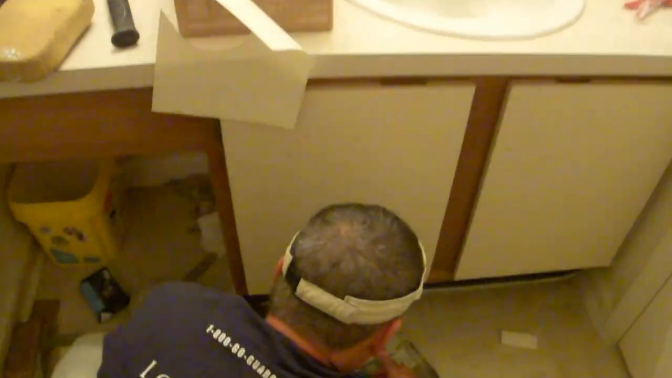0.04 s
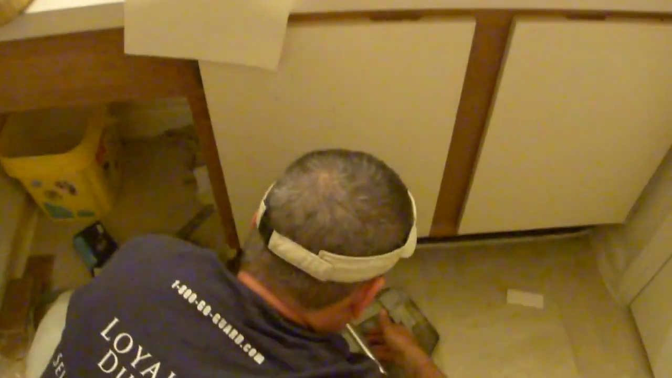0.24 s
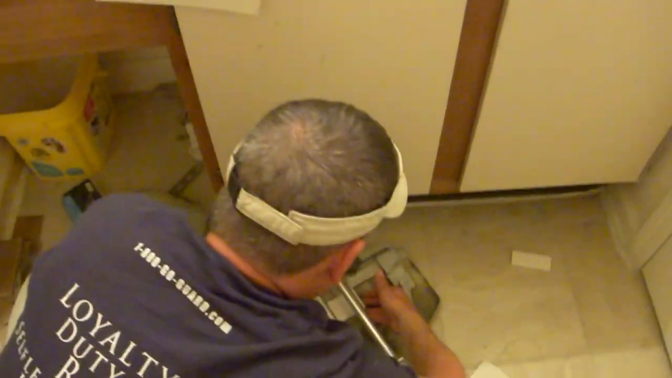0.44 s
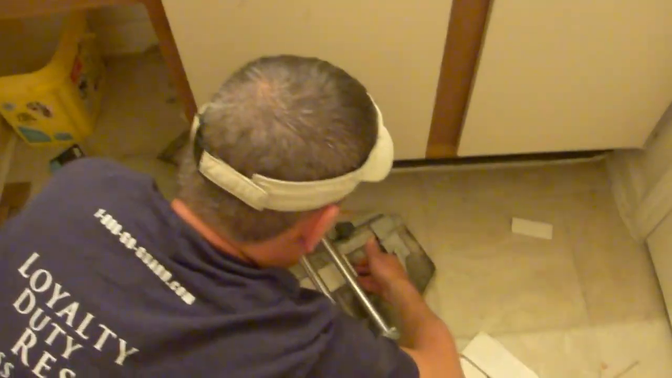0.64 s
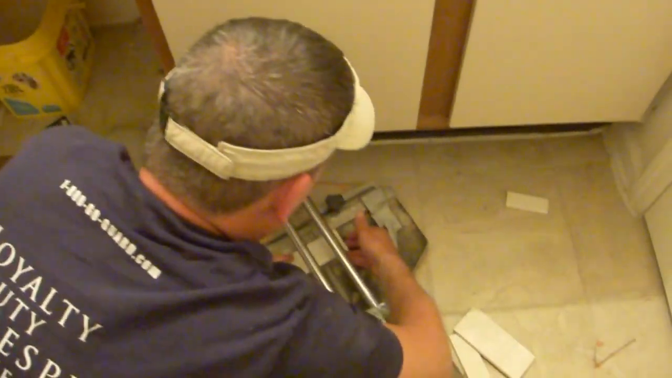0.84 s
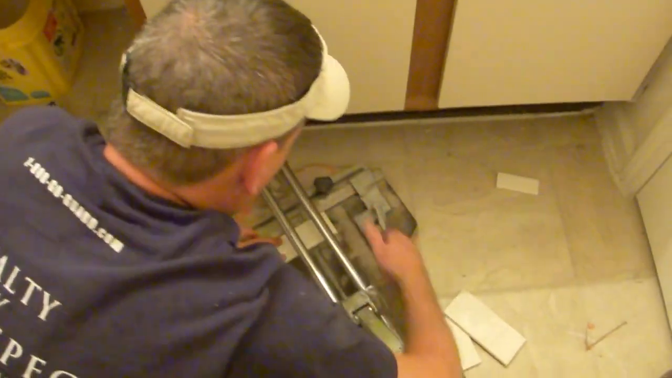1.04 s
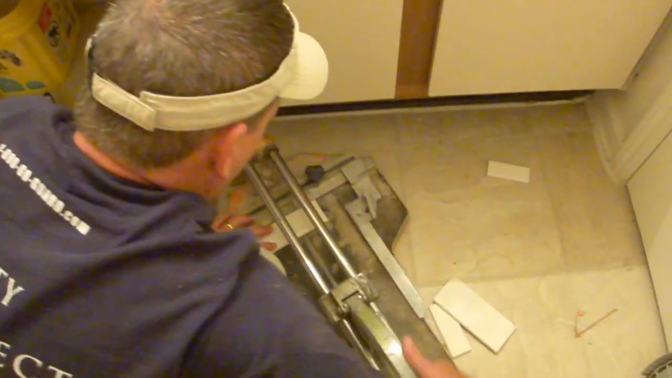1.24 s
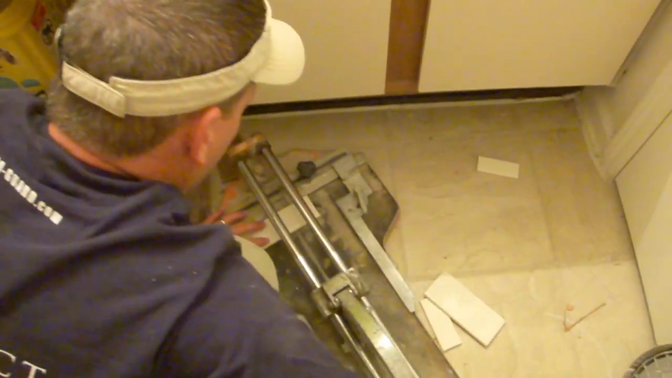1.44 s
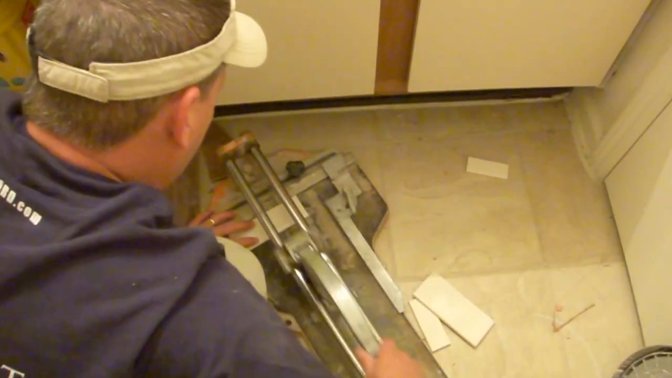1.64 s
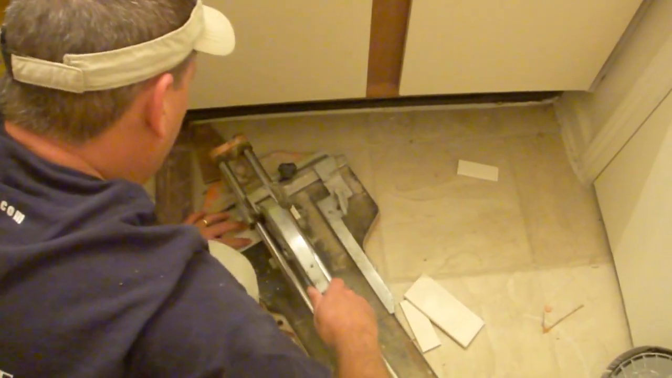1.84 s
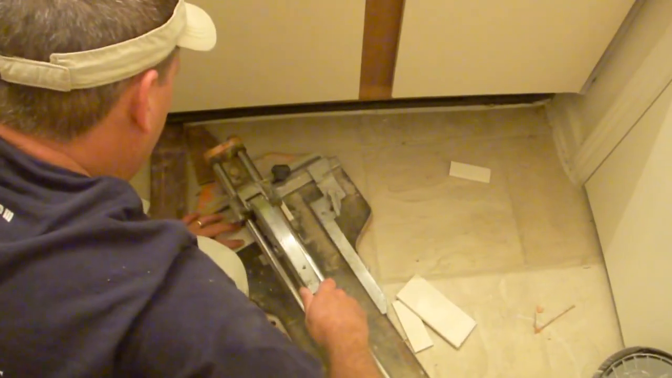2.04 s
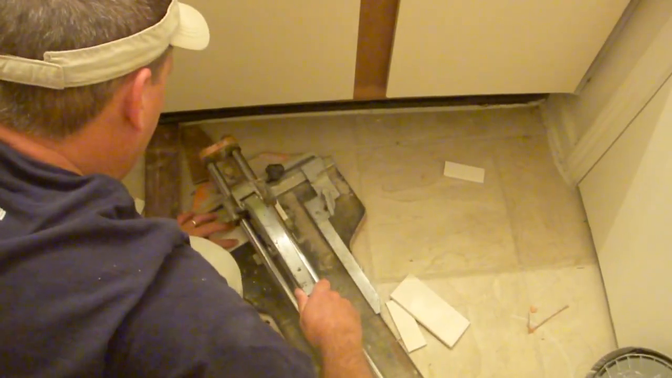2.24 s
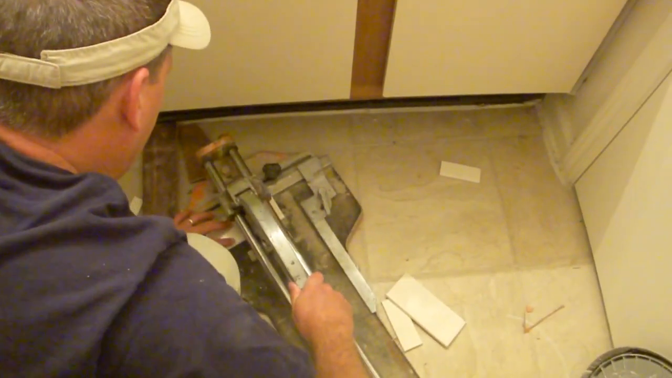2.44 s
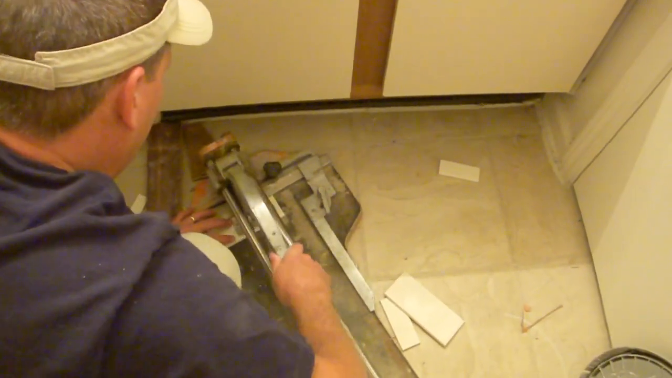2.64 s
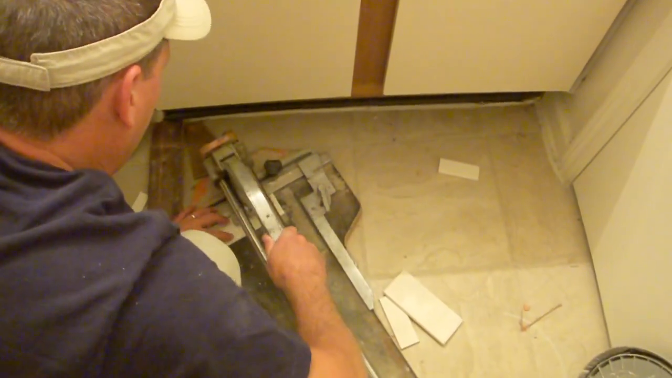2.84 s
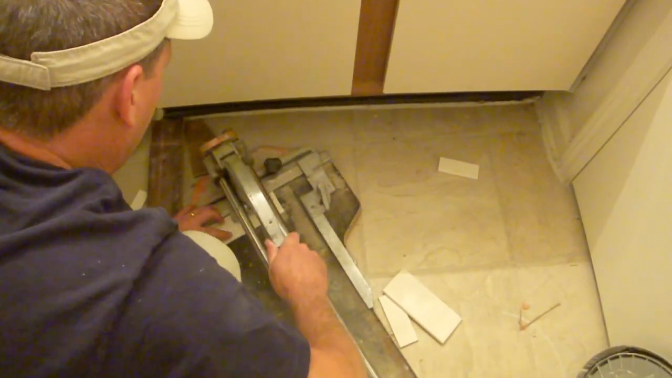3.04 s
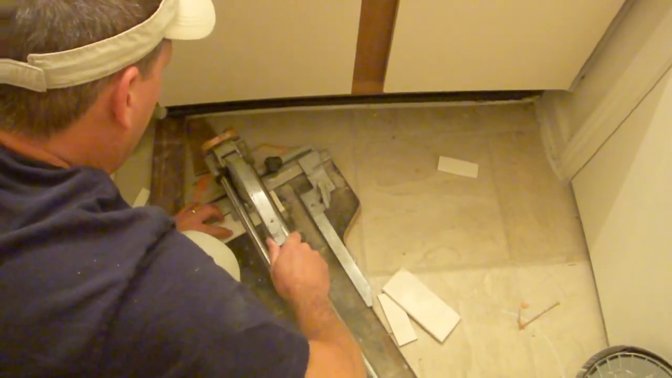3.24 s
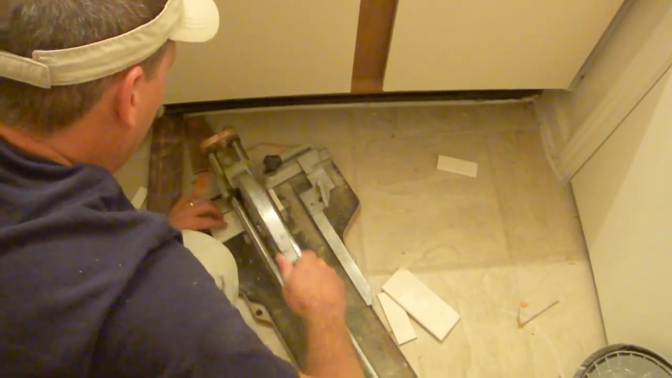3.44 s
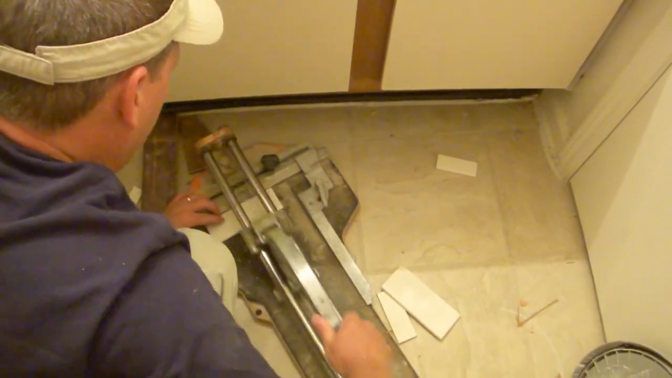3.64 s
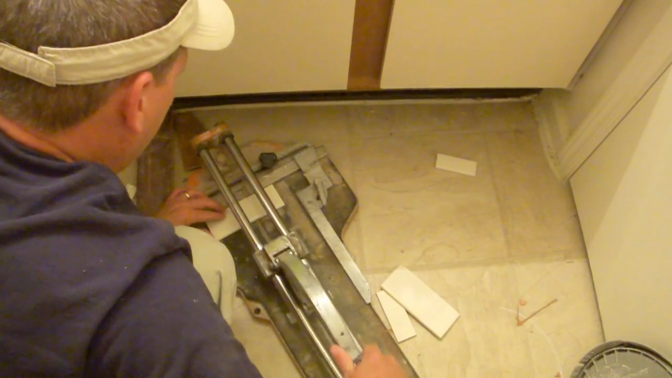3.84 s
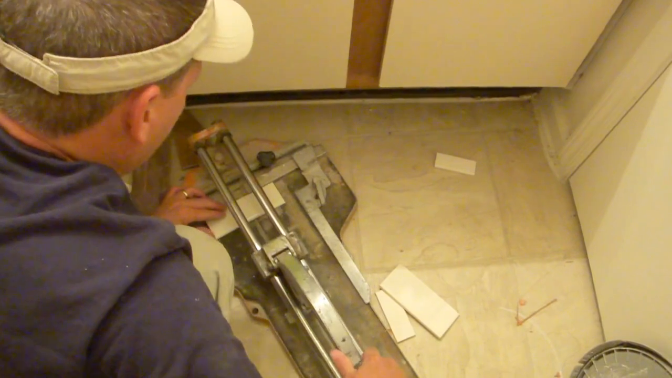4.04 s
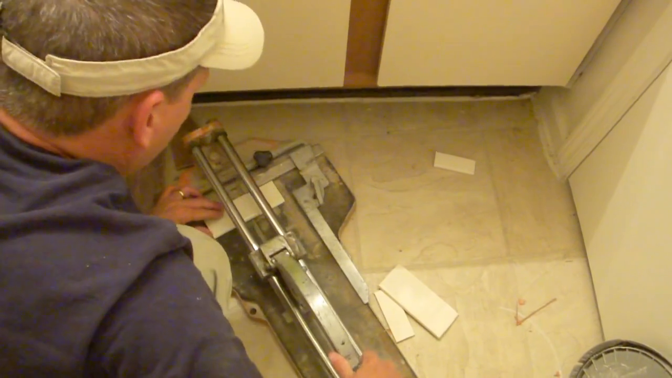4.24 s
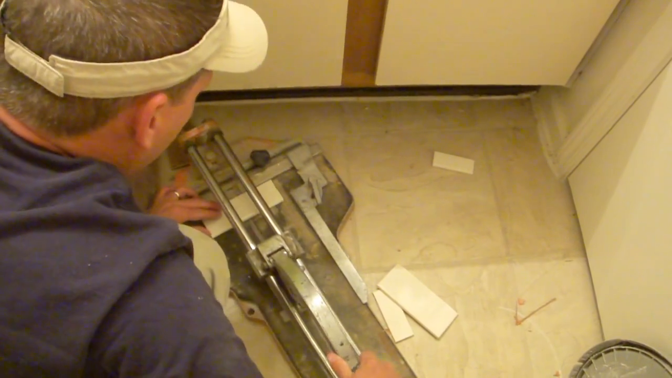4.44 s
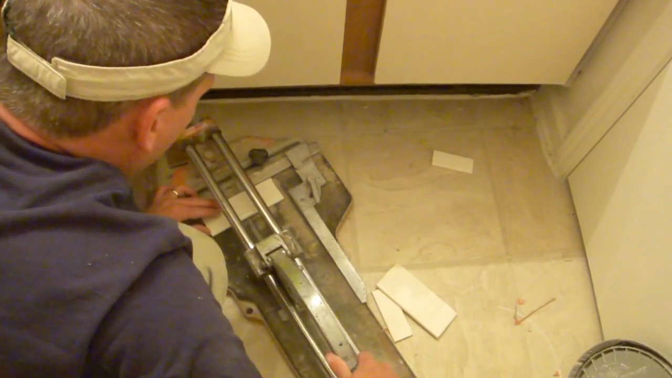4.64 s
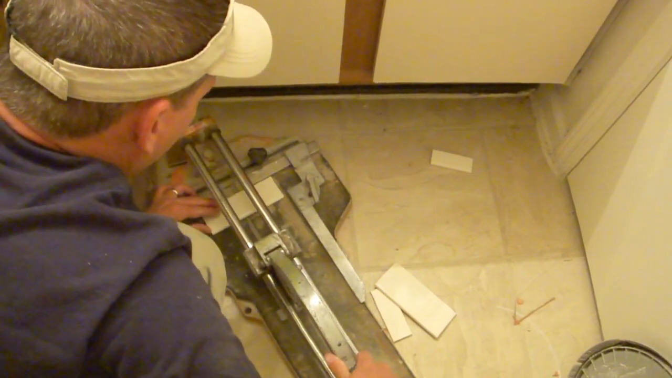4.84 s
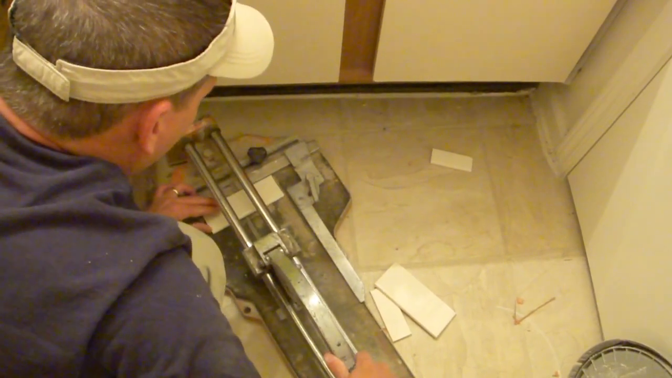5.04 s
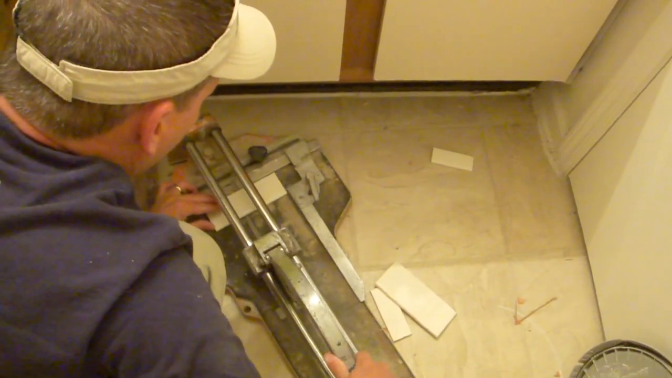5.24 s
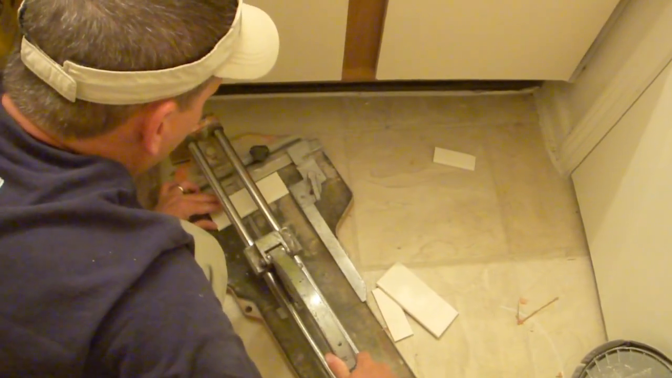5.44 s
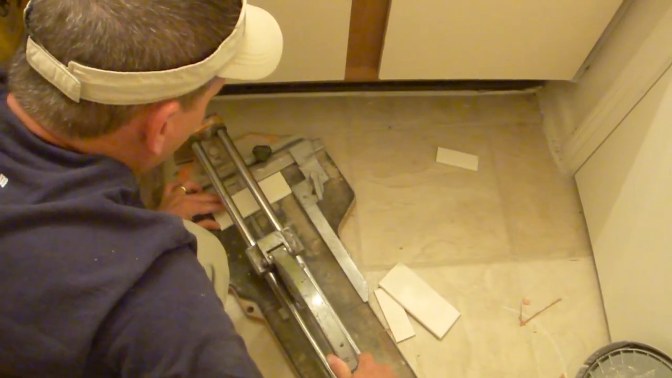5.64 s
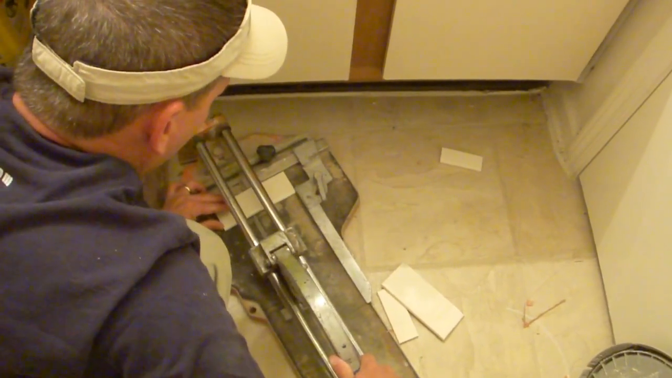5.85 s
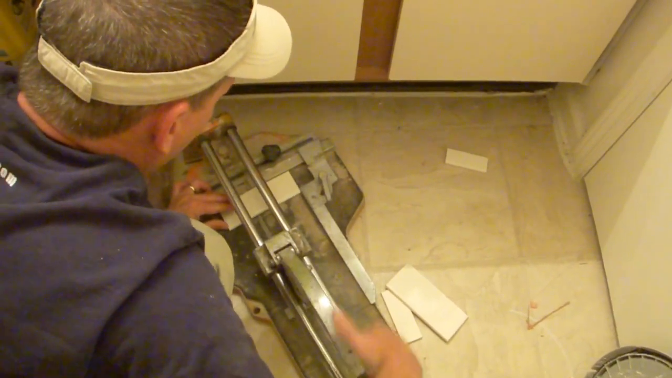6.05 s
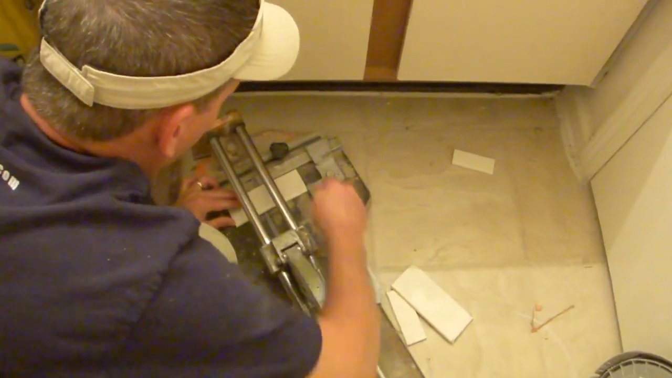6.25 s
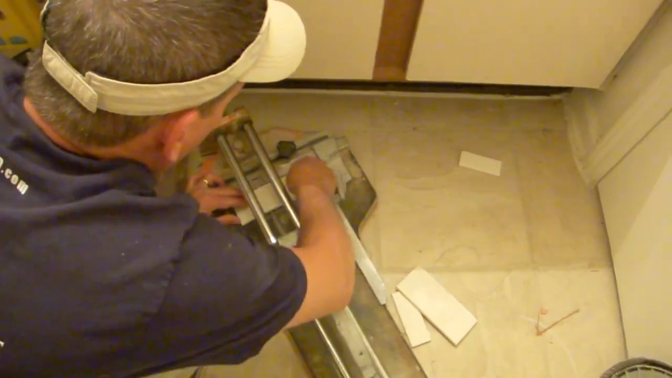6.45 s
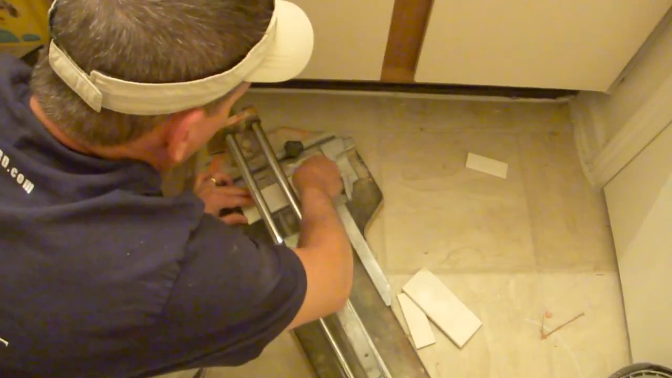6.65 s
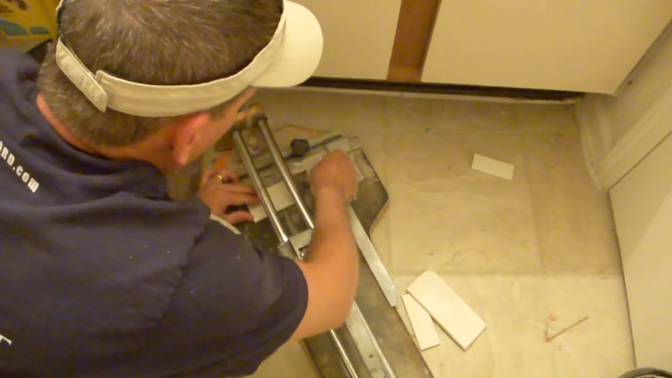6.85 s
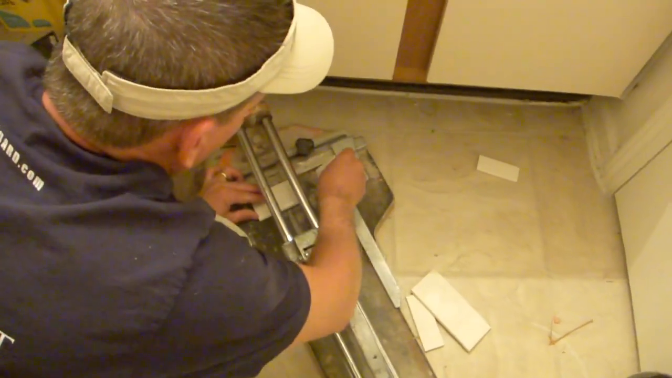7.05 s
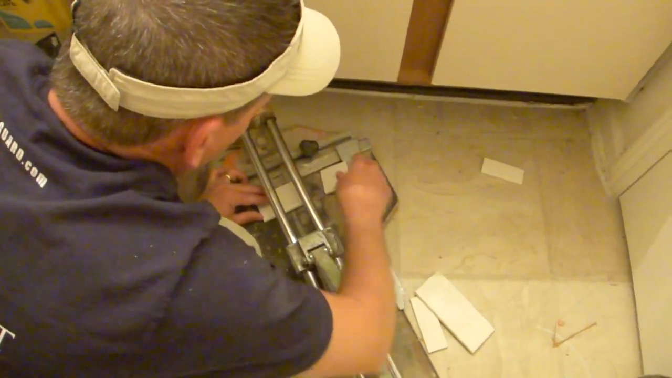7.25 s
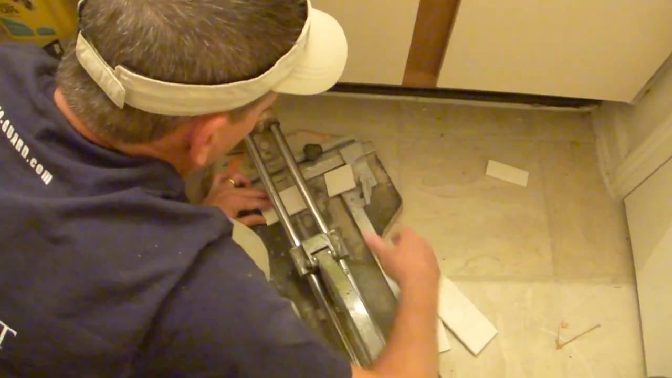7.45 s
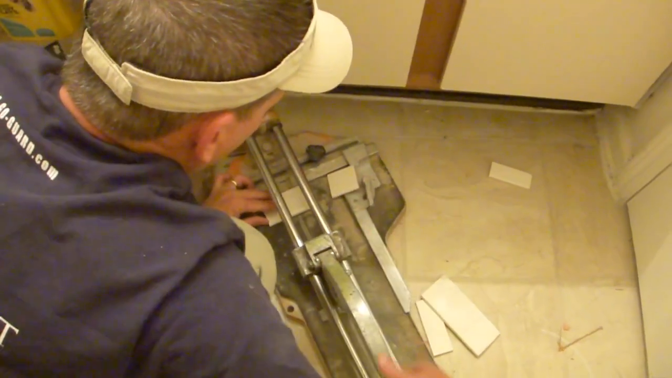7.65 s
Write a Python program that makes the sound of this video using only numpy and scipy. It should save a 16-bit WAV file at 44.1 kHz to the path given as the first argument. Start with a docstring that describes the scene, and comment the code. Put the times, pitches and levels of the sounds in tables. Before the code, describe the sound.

Metal rollers clatter out and back around a gritty screeching score and hard cracks, then faint tile scrapes and loud handle knocks in a ringing room.

```python
"""A hand tile cutter on a bathroom floor: its carriage rattles out along two steel rails, the wheel scores a
small tile, a press snaps it, then the carriage rolls back and the handle knocks down. Cut pieces scrape and
clink on the steel bed, clothing rustles, and the small hard room rings after every blow, over a quiet hush.
Rattle, rasp, glaze and cloth are random grains through filters; blows are damped noise and decaying modes;
groans, chirps and the wheel's screech are unsteady tones. All is in stereo, with little treble above 12 kHz."""
import sys
import numpy as np
from scipy import signal
from scipy.fft import rfft, irfft, next_fast_len
from scipy.io import wavfile
from scipy.ndimage import map_coordinates

SR = 44100
rng = np.random.default_rng(int(sys.argv[2]) if len(sys.argv) > 2 else 0)


def dump_mix(stems):
    """Bounce the given channels to the path in sys.argv[1] as a 16-bit WAV at rate SR."""
    frames = np.atleast_2d(stems).T  # one column per channel
    limited = np.clip(frames, -1, 1)  # hard clip at full scale
    pcm = np.round(limited * 32767).astype(np.int16)
    wavfile.write(sys.argv[1], SR, pcm)


N = 340011  # length in samples


def amp(db):
    """Decibels to gain."""
    return np.exp(np.asarray(db) * np.log(10) / 20)


def unit(x):
    """Scaled to rms 1."""
    return x / np.sqrt(np.mean(x ** 2) + 1e-20)


def struck(x):
    """Scaled to rms 1 over the first fiftieth of a second."""
    return x / np.sqrt(np.mean(x[..., :SR // 50] ** 2) + 1e-20)


def along(points, hz):
    """Interpolate (Hz, value) points on a log frequency axis."""
    point_hz, value = np.transpose(points)
    return np.interp(np.log(hz + 1), np.log(point_hz + 1), value)


def filtered(x, response):
    """x times a complex response of frequency."""
    n = x.shape[-1]
    padded = next_fast_len(n + 8192, True)
    spectrum = rfft(x, padded) * response(np.fft.rfftfreq(padded, 1 / SR))
    return irfft(spectrum, padded)[..., :n]


def coloured(x, points):
    """A causal minimum-phase filter with the gain of the (Hz, dB) points."""
    size = 2048
    gain = amp(along(points, np.fft.rfftfreq(size, 1 / SR)))
    cepstrum = irfft(np.log(gain))
    fold = np.r_[1, np.full(size // 2 - 1, 2), np.zeros(size // 2)]
    kernel = irfft(np.exp(rfft(cepstrum * fold)))
    return signal.oaconvolve(np.atleast_2d(x), kernel[None], axes=1)[:, :x.shape[-1]]


def band(x, lo_hz, hi_hz):
    """A causal band-pass."""
    return signal.sosfilt(signal.butter(3, [lo_hz, hi_hz], "band", fs=SR, output="sos"), x)


def add(track, s, sound):
    """Mix a sound in at time s."""
    part = track[:, max(round(s * SR), 0):][:, :sound.shape[1]]
    part += sound[:, :part.shape[1]]


def wobble(rate):
    """A smooth random curve, rate knots a second."""
    knots = rng.standard_normal(int(N * rate / SR) + 4)
    coarse = np.arange(0, N, 16)  # every 16th sample is enough
    curve = map_coordinates(knots, [coarse * rate / SR])
    return np.interp(np.arange(N), coarse, curve)


def grains(rate, spread_db):
    """Tiny contacts at random times, rate a second, of scattered sizes."""
    chance = rng.random(N)
    size = np.clip(rng.standard_normal(N), -2, 2)
    return unit((chance < rate / SR) * amp(spread_db * size) * rng.choice([-1, 1], N))


def ring(modes, width_hz):
    """Decaying modes, at slightly new strengths for each blow; their phases drift, which widens them."""
    t = np.arange(SR // 2) / SR
    hz, db, t60 = np.transpose(modes)[:, :, None]
    level = db + 1.5 * rng.standard_normal(hz.shape) - 60 * t / t60
    # the drift takes a new random slope every 128 samples
    slopes = rng.standard_normal((len(hz), len(t) // 128 + 1))
    steps = np.repeat(slopes, 128, axis=1)[:, :len(t)]
    drift = np.cumsum(steps, axis=1) * np.sqrt(2 * np.pi * width_hz / SR / 128)
    tones = np.sin(2 * np.pi * hz * t + drift)
    return np.sum(rng.choice([-1, 1], hz.shape) * amp(level) * tones, axis=0)


def crack(spectrum, t60):
    """The dense, quickly damped modes of a hard contact, as decaying coloured noise."""
    t = np.arange(SR // 2) / SR
    return coloured(rng.standard_normal(len(t)) * amp(-60 * t / t60), spectrum)


def resonances(hz, peaks):
    """Response of (Hz, width Hz, dB) resonances, alternating in sign."""
    total = 0
    for k, (centre, width, db) in enumerate(peaks):
        damping = 1j * hz * width
        total = total + (-1) ** k * amp(db) * damping / (centre * centre - hz * hz + damping)
    return total


SAG_DB_PER_S = 10.5  # a push slackens while it is held
RELEASE_DB = 20


def push(start, attack, hold, release):
    """Gain of one hand movement: it gathers speed, slackens while held, loses RELEASE_DB per release time."""
    t = np.arange(N) / SR - start
    sag = -SAG_DB_PER_S * np.clip(t - attack, 0, hold)
    fall = -RELEASE_DB * np.maximum(t - attack - hold, 0) / release
    return np.clip(t / attack, 0, 1) ** 2 * amp(np.maximum(sag + fall, -200))


def glide(judder, start, start_hz, hz_per_s):
    """A juddering tone of rms 1 whose pitch rises for up to a second."""
    hz = start_hz + hz_per_s * np.clip(np.arange(N) / SR - start, 0, 1)
    return unit(np.real(judder * np.exp(2j * np.pi * np.cumsum(hz) / SR)))


def diffuse(pair, width):
    """Two unrelated signals become the mid and side of a stereo pair; width sets the side's gain."""
    side = filtered(pair[1], lambda hz: amp(along(width, hz)))
    return np.array([pair[0] + side, pair[0] - side])


# how long the bathroom rings: pitch_hz, t60_s
ROOM_DECAY = [(150, 0.22), (400, 0.46), (1000, 0.4), (2800, 0.35), (7000, 0.35), (12000, 0.2)]
# stereo width of the room's tail, nearly mono in the low mids: pitch_hz, side_level_db (against mid)
ROOM_WIDTH = [(50, -6), (125, -12), (300, -16), (700, -15), (1400, -10), (2800, -5), (5500, -2), (10000, 0)]


def bathroom(x, wet_db):
    """The direct sound and a dense tail from the close walls, each pitch dying at its own rate."""
    hz, t, grid = signal.stft(rng.standard_normal((2, SR // 2)), SR, nperseg=256)
    decay = amp(-60 * t / along(ROOM_DECAY, hz)[:, None])
    tail = signal.istft(grid * decay, SR, nperseg=256)[1]
    tail = diffuse(tail / np.linalg.norm(tail[0]), ROOM_WIDTH)
    tail = np.pad(tail, ((0, 0), (SR // 400, 0)))  # the tail starts 2.5 ms late
    x = np.atleast_2d(x)
    return x + amp(wet_db) * signal.fftconvolve(x, tail, axes=1)[:, :x.shape[1]]


# spectrum of the house's hush: pitch_hz, level_db (relative, per Hz)
HUSH_SPECTRUM = [(15, -80), (25, -8), (49, -63), (90, -20), (112, -8), (257, -10), (293, -4), (450, -6),
                 (558, -2.5), (811, -4.5), (1090, -3.5), (1500, -8.5), (4040, -14), (10300, -20.5),
                 (15000, -36)]
# stereo width of the hush: pitch_hz, side_level_db (against mid)
HUSH_WIDTH = [(60, -19), (110, -2), (200, 5), (380, 4), (700, 2), (1290, 2), (2380, 2), (4400, 0),
              (8120, 0), (15000, 3)]


def air():
    """The hush of the house: wide coloured noise whose level wanders slightly."""
    noise = diffuse(rng.standard_normal((2, N)), HUSH_WIDTH)
    hush = unit(coloured(noise, HUSH_SPECTRUM))
    return amp(-46 + 1.2 * wobble(9.8)) * hush


# clothing, one row a movement: start_s, attack_s, hold_s, release_s, rub_level_db, swish_level_db
RUSTLES = [(0, 0.0017, 0.075, .18, -40, -44.5), (.93, 0.11, .01, 0.11, -46, -53),
           (1.291, .022, .015, 0.1, -54, -45), (6.027, 0.14, .035, 0.041, -58, -49)]
# spectrum of cloth: pitch_hz, level_db (relative, per Hz)
CLOTH_SPECTRUM = [(150, -23), (300, 2), (1200, -6), (2200, -5.5), (3500, -0.5), (6000, -2), (11000, -9),
                  (13500, -25)]


def clothing():
    """Cloth rubs and swishes as the arm moves: fibre contacts, split into a low and a high band."""
    fibres = bathroom(coloured(grains(rate=3800, spread_db=5.5), CLOTH_SPECTRUM), wet_db=-4.5)
    rub = unit(band(fibres, 200, 3000))
    swish = unit(band(fibres, 3000, 13000))
    out = np.zeros((2, N))
    for *timing, rub_db, swish_db in RUSTLES:
        out += push(*timing) * (amp(rub_db) * rub + amp(swish_db) * swish)
    return out


# blows on the frame, the snap among them, and a soft bump of clothing at the start:
# start_s, clack_level_db, thump_db, edge_db (both over the clack)
KNOCKS = [(.051, -52.5, 12, -8), (.474, -48, 1.5, -12), (1.354, -44.5, -3.5, -28), (1.444, -42.5, -5, -32),
          (1.559, -46, 0, -20), (1.603, -42, 2, -17), (2.235, -32, -2.5, -12), (2.397, -40.5, -10, -4.5),
          (2.44, -40, 1.5, -6), (2.753, -14, -9, -9), (2.883, -19, -3, -31), (3.138, -20.5, -2, -38),
          (3.239, -11.5, -7.5, -11.5), (3.245, -13, -9, -9), (3.288, -17.5, -18, -10.5),
          (3.39, -20.5, -9, -29), (5.712, -38.5, -19, -16), (6.23, -15, -17, -22.5),
          (6.242, -15.5, -15, -14.5), (6.364, -35, -1, -30), (6.813, -33, 0.5, -13), (6.992, -32, -11, -27),
          (7.145, -41, 2.5, -13)]
# modes of the cutter's frame: pitch_hz, level_db, t60_s
FRAME_MODES = [(302, -11, .25), (345, -9, .3), (502, -3, .25), (587, -3, .25), (655, -1, .17),
               (785, -4, .15), (851, -1, .25), (1075, -6, .2), (1240, -2, .2), (1450, -7, .22),
               (1650, -8, .15), (1787, -9, .15), (1879, -8, .2), (2450, -10, .15), (2900, -16, .15),
               (4100, -22, .2), (5230, -24, .45)]
# spectrum of a clack: pitch_hz, level_db (relative, per Hz)
CLACK_SPECTRUM = [(29, -145), (50, -34), (346, -8.5), (439, -11.5), (643, 2), (856, -8), (941, -4),
                  (1220, -5.5), (4770, -19), (5250, -22.5), (5640, -25), (10200, -38), (15000, -64)]
CRACK_DB, CRACK_SHARE = 2.5, 0.49  # the crack over the clack, and how far it follows the edge


def knocks():
    """Each row sounds a clack and the frame's ring; weight adds thump, hard contact adds edge and crack."""
    out = np.zeros((2, N))
    edges_hz = [210, 560, 1800, 5600, 14000]  # limits of the thump, clack, crack and edge bands
    for s, db, thump_db, edge_db in KNOCKS:
        clack = struck(bathroom(crack(CLACK_SPECTRUM, t60=.028), wet_db=-1.5))
        frame = struck(bathroom(ring(FRAME_MODES, width_hz=4), wet_db=-4))
        blow = clack + amp(-7) * frame
        weights = amp([thump_db, 0, CRACK_DB + CRACK_SHARE * edge_db, edge_db])
        bands = zip(weights, edges_hz, edges_hz[1:])
        add(out, s, amp(db) * sum(w * struck(band(blow, lo, hi)) for w, lo, hi in bands))
    return out


# dry bearings chirping on the rails: start_s, pitch_hz, peak_level_db, length_s
SQUEAKS = [(1.309, 3410, -40.5, 0.037), (3.105, 8160, -45, 0.042), (3.557, 5490, -19, 0.0084),
           (6.806, 5450, -33, 0.019)]


def squeak():
    """A dry bearing sticks and chirps: a swelling sine, its pitch wavering."""
    out = np.zeros(N)
    for s, hz, db, length in SQUEAKS:
        swell = np.sin(np.pi * np.clip((np.arange(N) / SR - s) / length, 0, 1))
        pitch = hz * (1 + .025 * wobble(300))
        out += amp(db) * swell * np.sin(2 * np.pi * np.cumsum(pitch) / SR)
    return bathroom(out, wet_db=-8.0)


# carriage strokes, and a brief rattle just before the handle knocks down:
# start_s, attack_s, hold_s, release_s, rattle_level_db
STROKES = [(1.422, 0.13, 0.095, .08, -46), (1.623, 0.096, .23, 0.15, -12), (2.401, .3, .19, .11, -19.5),
           (3.098, 0.043, 0.012, 0.11, -24), (3.27, 0.041, 0.14, 0.09, -29.5),
           (3.414, 0.17, 0.3, 0.12, -13), (6.2, 0.026, .002, .015, -32.5)]
# resonances of the rails under the carriage: pitch_hz, width_hz, level_db
RAIL_PEAKS = [(860, 45, -4), (1075, 60, 0), (1230, 45, -2), (1310, 70, -6), (1480, 70, -9), (1745, 110, -7),
              (2100, 90, -17), (2470, 60, -14), (5400, 200, -25)]
# resonances of the base plate: pitch_hz, width_hz, level_db
PLATE_PEAKS = [(585, 30, -4), (640, 40, -1), (688, 35, 0), (735, 40, -7)]
# spectrum of the gritty bearings: pitch_hz, level_db (relative, per Hz)
BEARING_SPECTRUM = [(29, -84), (50, -68), (86, -57), (260, -18), (398, -21), (448, -7), (541, -13.5),
                    (669, 2.5), (808, -5), (1070, -6.5), (2390, -19.5), (3920, -29.5), (5450, -30),
                    (11300, -38), (14000, -104)]
# the carriage passes over the plate's near end, where it booms most, going out and coming back: time_s
NEAR_END_PASSES = [1.745, 3.805]
BOOM_DB, PASS_DB, PASS_S = -10, 6.5, 0.047  # under the rattle; gain at the pass; half its duration
TREBLE_HZ, BRIGHTENS = 2250, 1.1  # where the treble begins; it grows with this power of the speed


def carriage():
    """Gritty bearings rattle the rails, brighter with speed, and make the base plate boom."""
    rails = unit(filtered(grains(rate=1700, spread_db=4.5), lambda hz: resonances(hz, RAIL_PEAKS)))
    plate = filtered(grains(rate=900, spread_db=7), lambda hz: resonances(hz, PLATE_PEAKS))
    grit = unit(coloured(grains(rate=900, spread_db=2.0), BEARING_SPECTRUM))
    rattle = unit(bathroom(rails + grit, wet_db=-1.5)) * amp(wobble(45))
    treble = filtered(rattle, lambda hz: hz ** 4 / (hz ** 4 + TREBLE_HZ ** 4))
    boom = unit(bathroom(plate, wet_db=6))
    t = np.arange(N) / SR
    near_end = sum(np.exp(-((t - s) / PASS_S) ** 2) for s in NEAR_END_PASSES)
    body = rattle - treble + amp(BOOM_DB + PASS_DB * near_end) * boom
    out = np.zeros((2, N))
    for *timing, db in STROKES:
        speed = push(*timing)
        out += amp(db) * (speed * body + speed ** BRIGHTENS * treble)
    return out


# rails bending under a loaded carriage: start_s, attack_s, hold_s, release_s, starting pitch_hz, level_db
GROANS = [(1.426, 0.026, 0.14, .05, 665, -43), (2.552, 0.09, 0.11, 0.11, 280.7, -22.5),
          (2.855, 0.038, .01, 0.048, 286, -32), (3.294, .04, 0.029, 0.037, 379, -29),
          (3.483, 0.041, .09, 0.18, 441, -23.5)]
GROAN_HZ_PER_S = 300  # rise of the pitch as the load grows


def groans():
    """The loaded rails judder at a pitch that rises as the carriage travels."""
    judder = wobble(55) + 1j * wobble(55)
    out = np.zeros(N)
    for start, *shape, hz, db in GROANS:
        out += amp(db) * push(start, *shape) * glide(judder, start, hz, GROAN_HZ_PER_S)
    return bathroom(out, wet_db=-15)


# the wheel biting the glaze: start_s, attack_s, hold_s, release_s, crackle_level_db
SCORES = [(2.54, 0.119, 0.086, 0.029, -18.5), (3.102, 0.026, .005, 0.015, -35.5)]
# larger chips breaking out of the glaze: start_s, level_db
CHIPS = [(2.478, -42), (2.521, -40.5), (2.572, -34), (2.604, -30.5), (2.65, -21.5)]
# spectrum of breaking glaze: pitch_hz, level_db (relative, per Hz)
GLAZE_SPECTRUM = [(50, -38), (200, -5), (500, 9.5), (1500, -3), (2500, -3.5), (4200, -4.5), (5400, -11),
                  (6800, -8.5), (8100, -2), (9300, -10.5), (11500, -5.5), (12800, -20), (14000, -25)]
# the screech rises as the wheel gathers speed; its level is against the crackle
SCREECH_HZ, SCREECH_HZ_PER_S, SCREECH_DB = 3400, 5000, -11


def wheel():
    """The wheel screeches and crushes the glaze in clumps of tiny fractures, with a few larger chips."""
    fractures = grains(rate=800, spread_db=6) * amp(3.5 * wobble(160))
    crackle = unit(bathroom(coloured(fractures, GLAZE_SPECTRUM), wet_db=1.5))
    judder = wobble(350) + 1j * wobble(350)
    out = np.zeros((2, N))
    for start, attack, hold, release, db in SCORES:
        screech = glide(judder, start, SCREECH_HZ, SCREECH_HZ_PER_S)
        out += amp(db) * push(start, attack, hold, release) * (crackle + amp(SCREECH_DB) * screech)
    for s, db in CHIPS:
        chip = band(crack(GLAZE_SPECTRUM, t60=.03), 2500, 15000)
        add(out, s, amp(db) * struck(bathroom(chip, wet_db=-3)))
    return out


# hard chinks, tile against wheel or bed, and the handle knocking down:
# start_s, chink_level_db, tile_ring_level_db, bed_ring_level_db
CLINKS = [(2.504, -29.5, -52, -29), (2.756, -16, -34, -39), (3.139, -31.5, -59, -40),
          (3.441, -22, -53.5, -25), (4.134, -49.5, -47, -56), (4.303, -56, -43, -64),
          (4.59, -52, -39.5, -74), (5.1, -60, -45, -74), (5.327, -44, -42, -52), (5.49, -64, -50.5, -66),
          (6.231, -26, -57, -40), (6.243, -21, -51, -35), (6.813, -26.5, -33.5, -35),
          (6.959, -33, -33.5, -47), (7.105, -47, -50, -45), (7.22, -28, -38.5, -31),
          (7.275, -14.5, -13.5, -16.5)]
# spectrum of a chink: pitch_hz, level_db (relative, per Hz)
CHINK_SPECTRUM = [(30, -54), (100, -26), (220, -12), (350, -21), (600, -0.5), (1200, -4.5), (2300, 6),
                  (3500, -6), (6000, -25.5), (8000, -24), (11500, -37), (15000, -38)]
# modes of the steel bed: pitch_hz, level_db, t60_s
BED_MODES = [(380, -11, .25), (505, -7, .2), (582, -2, .22), (760, -12, .15), (1035, -3, .22),
             (1120, -5, .25), (1200, -3, .22), (1245, -2, .33), (1330, -9, .15), (1535, -8, .28),
             (1610, -8, .2)]
# modes of the tile, which also sing in sliding(): pitch_hz, level_db, t60_s (shortened in clinks())
TILE_MODES = [(4500, -4, .2), (4540, 0, .33), (4575, -3, .22), (5120, -9, .15), (5480, -6, .15),
              (6510, -6, .2), (6630, -9, .2), (7512, -3, .33), (7560, -7, .2), (8730, -13, .15),
              (9050, -13, .15), (10720, -7, .22), (10850, -10, .15), (11190, -9, .25)]
RING_SHARE = 0.56  # the tile's ring time in every clink, as a share of the listed times
CHATTER_HZ = 22  # loose pieces chatter, which widens the bed's modes by this much and the tile's by twice it
EDGE_DB, EDGE_GROWS = 12, 2.33  # splintery top of a chink: level at full force (0 dB), dB per dB of chink


def clinks():
    """Hard contacts: a chink, sharper with force, the tile's high modes and the bed's low ones."""
    out = np.zeros((2, N))
    shortened = [(hz, level, t60 * RING_SHARE) for hz, level, t60 in TILE_MODES]
    for s, chink_db, tile_db, bed_db in CLINKS:
        splinter = struck(band(crack(CHINK_SPECTRUM, t60=0.018), 4050, 9700))
        edge = amp(EDGE_DB + EDGE_GROWS * chink_db) * splinter
        contact = amp(chink_db) * struck(crack(CHINK_SPECTRUM, t60=0.019)) + edge
        tile = struck(bathroom(ring(shortened, 2 * CHATTER_HZ), wet_db=-1))
        bed = struck(band(bathroom(ring(BED_MODES, CHATTER_HZ), wet_db=0), 350, 3000))
        add(out, s, bathroom(contact, wet_db=-3.5) + amp(tile_db) * tile + amp(bed_db) * bed)
    return out


# a tile pushed about on the bed: start_s, attack_s, hold_s, release_s, rasp_level_db, ringing_level_db
SLIDES = [(3.95, 0.16, 0.21, 0.16, -40.5, -44), (4.433, 0.066, 0.063, 0.086, -49.5, -48.5),
          (4.608, 0.11, 0.14, 0.31, -43, -47), (5.074, 0.18, 0.055, 0.08, -38.5, -46),
          (5.425, 0.22, 0.084, 0.052, -50.5, -54), (6.62, 0.24, .08, 0.05, -45.5, -44.5)]
# spectrum of the rasp: pitch_hz, level_db (relative, per Hz)
RASP_SPECTRUM = [(88, -29), (150, -60), (202, -14), (451, -11), (733, -13), (1090, -8), (1260, -12.5),
                 (4570, -16.5), (8150, -24), (11000, -23), (13000, -62)]


def sliding():
    """Grit under the tile rasps on the bed; it catches in fits and keeps the finger-damped tile ringing."""
    rasp = unit(bathroom(coloured(grains(rate=3100, spread_db=8), RASP_SPECTRUM), wet_db=7.0))
    catches = grains(rate=900, spread_db=4) * amp(2 * wobble(30))
    damped = [(hz, 80, db) for hz, db, t60 in TILE_MODES]  # each mode 80 Hz wide
    singing = unit(bathroom(filtered(catches, lambda hz: resonances(hz, damped)), wet_db=-2))
    out = np.zeros((2, N))
    for *timing, rasp_db, ring_db in SLIDES:
        out += push(*timing) * (amp(rasp_db) * rasp + amp(ring_db) * singing)
    return out


def scene():
    """All sources together; the cutter is raised 0.35 dB on the left and lowered 0.35 dB on the right."""
    cutter = knocks() + squeak() + carriage() + groans() + wheel() + clinks() + sliding()
    balance = amp([[.35], [-.35]])  # decibels turned into two positive gains, 1.04 and 0.96
    return air() + clothing() + cutter * balance


def record(dry):
    """The finished sound: little treble above 12 kHz, peaks rounded off at full scale, deep bass lost."""
    dull = coloured(dry, [(11500, -1.0), (12500, -3.0), (13500, -21), (15500, -14)])
    rounded = dull / (1 + dull ** 10) ** (1 / 10)
    # bass falls below 100 Hz, and a steep cut ends the treble at 15500 Hz
    return filtered(rounded, lambda hz: hz ** 2 / np.hypot(hz ** 2, 100 ** 2) / (1 + (hz / 15500) ** 80))


dry = scene()
out = record(dry)
dump_mix(out)
```